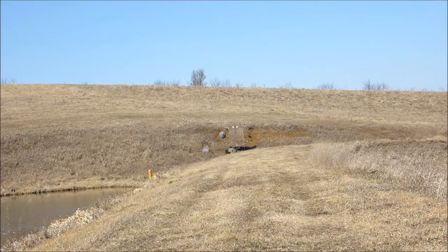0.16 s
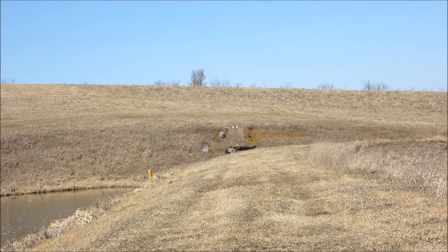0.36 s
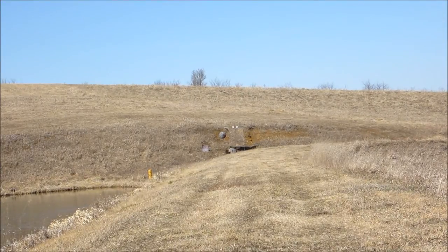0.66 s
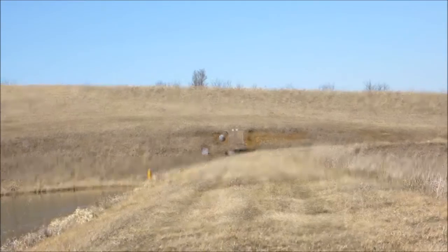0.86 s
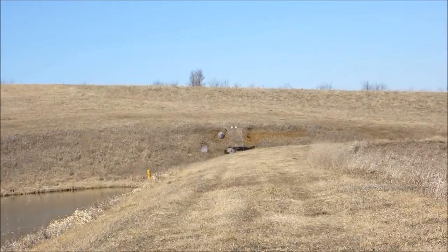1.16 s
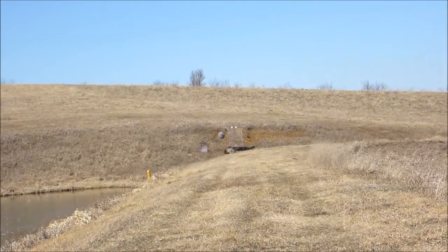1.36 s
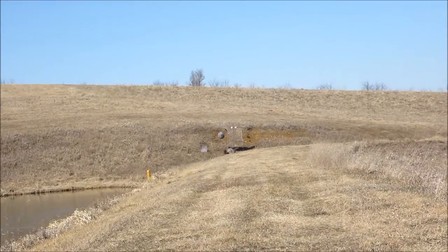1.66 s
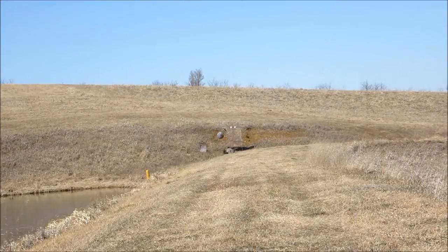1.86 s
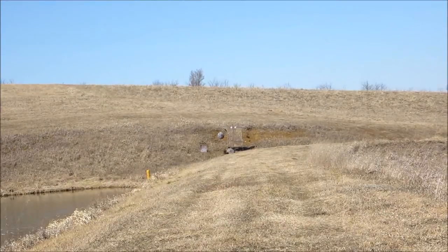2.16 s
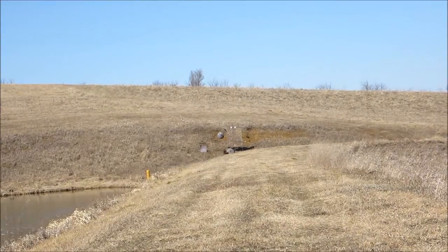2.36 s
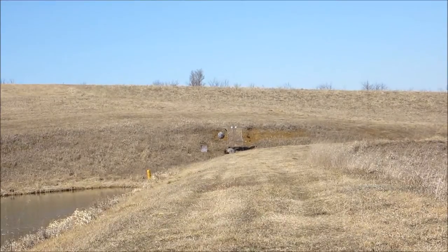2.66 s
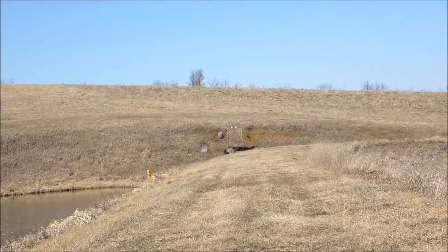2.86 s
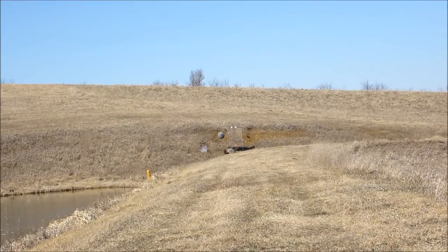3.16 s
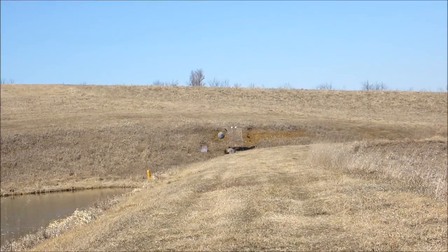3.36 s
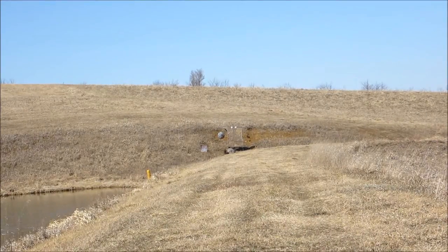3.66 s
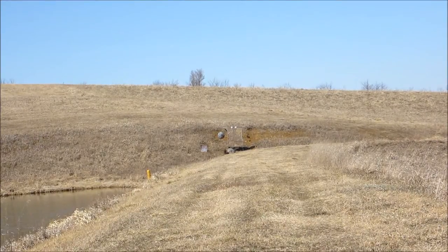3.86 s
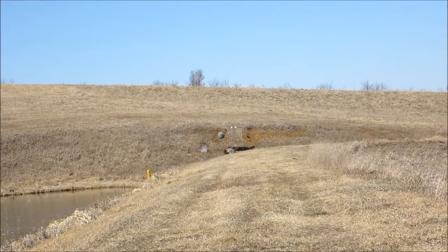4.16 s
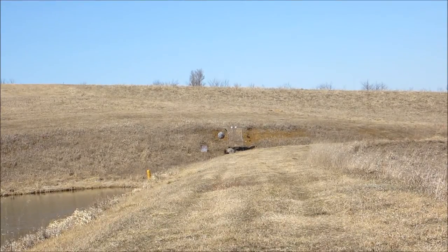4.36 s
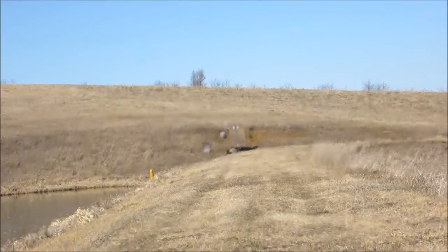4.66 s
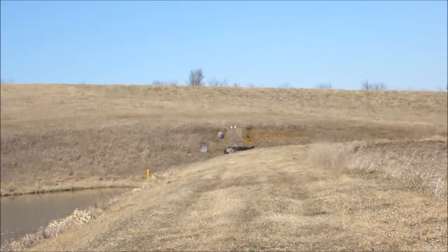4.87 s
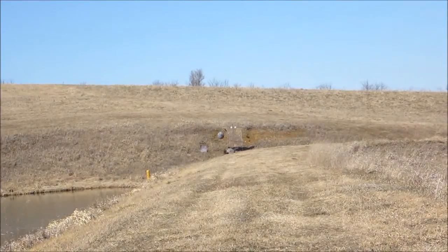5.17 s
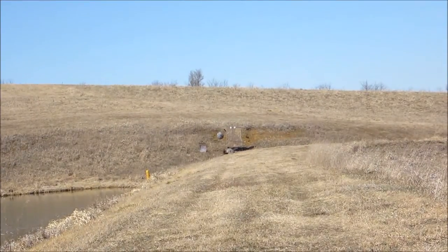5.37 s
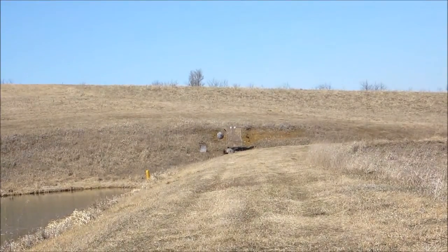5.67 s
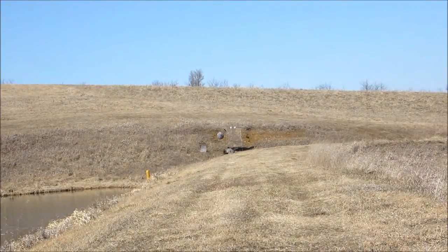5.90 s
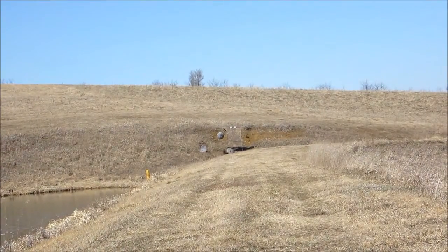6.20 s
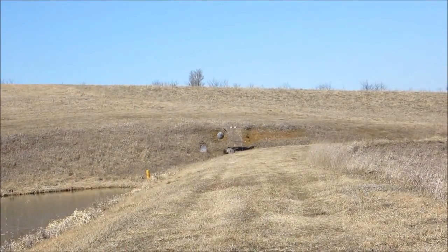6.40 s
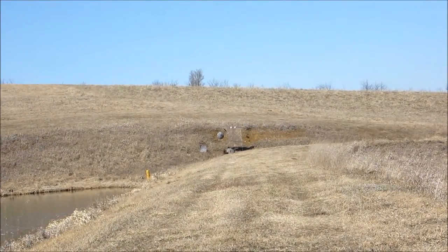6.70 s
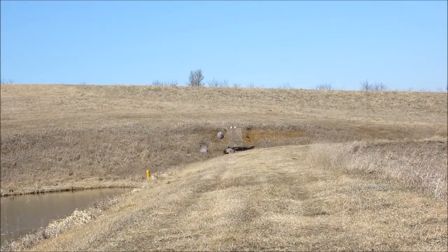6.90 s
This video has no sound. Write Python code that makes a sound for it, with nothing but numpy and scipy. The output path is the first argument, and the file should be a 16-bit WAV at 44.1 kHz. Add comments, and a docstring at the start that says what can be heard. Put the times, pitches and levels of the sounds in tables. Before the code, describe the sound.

Two sharp revolver shots, about four seconds apart, briefly overload a nearby microphone and roll away softly across grassy hills. Each is followed by a tiny double click of the trigger and, about a second later, the crisp ratcheting of the hammer being drawn back. The field is otherwise quiet, with a faint hiss of dry grass, a far engine humming and a few low wind bumps.

```python
"""Two revolver shots in a field

A small revolver is fired twice near the microphone, facing a grassy bank. Each blast overloads the
input and knocks the gain down; the slopes return a soft rushing echo. After each shot the trigger
springs back and the hammer is cocked. Wind nudges the microphone, grass hisses, an engine hums far off."""
import sys
import numpy as np
from scipy import signal
from scipy.fft import rfft, irfft
from scipy.io import wavfile

SR = 44100
rng = np.random.default_rng(int(sys.argv[2]) if len(sys.argv) > 2 else 0)


def unload_wav(signal):
    """Save mono or channel-first audio to the path in sys.argv[1] as 16-bit WAV at rate SR, clipped to [-1, 1]."""
    wavfile.write(
        sys.argv[1],
        SR,
        np.round(np.clip(np.atleast_2d(signal).T, -1, 1) * 32767).astype(np.int16),
    )


N = 310464
TIME = np.arange(N) / SR

# Hammer drawn back. Each row: start in seconds, duration factor, level in dB, spring ring in dB.
COCKINGS = [(1.762, 1.0, 0, -61), (5.4452, .932, -.5, -70)]
# Clicks of one cocking, first pawl touch to full cock.
# Each row: seconds into the stroke, level in dB, ring in Hz, relative grip knock in dB.
STROKE_CLICKS = [(0.001, -36.5, 6900, -13), (.0305, -32.5, 3900, -14), (.0484, -31, 4120, -4),
                 (0.0687, -26.5, 9600, -8), (.096, -8, 4170, -21.5), (.1276, -27.5, 6700, -8),
                 (.142, -39.5, 11300, 7), (.159, -7.5, 3560, -12.5)]


def blast(t, rail_db=19, coupling_hz=230, tear_db=17, scatter_start_s=.002, scatter_attack_s=.018):
    """A hissing jet, then pressure fronts and scatter that flatten against the microphone's limit."""
    # Hammer and primer, cylinder-gap gas, muzzle jet.
    # Each row: start from the shot, attack, hold and t60 in seconds, level in dB.
    firing = [(-.0102, .0004, .0005, .04, -27), (-.004, .0014, .014, .02, -14),
              (-.0002, .0002, .0008, .014, 24.5)]
    # Shock pulses of the blast. Each row: delay and length in seconds, height in dB.
    shock_pulses = [(.0032, .0010, 28.5), (.0072, .0011, 26), (.0114, 0.00064, 28.5), (0.016, .00034, 24),
                    (.0208, .0002, 17)]
    # Near echoes. Each row: delay in seconds, level in dB, pitch in Hz, t60 in seconds.
    near_echoes = [(0.0376, 5.5, 947, .012), (0.0488, 13.5, 1653, 0.0076)]
    # Noise spectra. Each row: frequency in Hz, relative level in dB.
    jet_spectrum = [(500, -20.5), (1400, -12.5), (2200, -4.5), (2600, -6), (3600, 4), (5200, -6.5),
                    (7000, -1.5), (11000, -1.5), (13500, -1.5), (15500, -1), (16500, -30.5)]
    roar_spectrum = [(100, -1.5), (250, 0.5), (600, -2.5), (1000, -1), (1600, -3), (2600, -14),
                     (4000, -23.5), (15000, -47.5)]
    sizzle_spectrum = [(300, -5.5), (2000, -1.5), (3500, 0), (5000, -4), (10000, 0.5), (15500, -11.5)]

    gas = sum(from_db(db) * envelope(t - s, attack, hold, t60) for s, attack, hold, t60, db in firing)
    jet = gas * coloured(jet_spectrum)
    fronts = sum(from_db(db) * ((t > s) & (t < s + length)) for s, length, db in shock_pulses)
    fronts += (fronts > 0) * from_db(tear_db) * coloured(sizzle_spectrum)  # turbulence tears the tops
    fronts = cut(cut(fronts, 9000, "low"), coupling_hz, "high", order=1)  # leaves an undershoot
    # Nearby grass scatters a dull roar, a bright sizzle and a faint lingering hiss.
    age_s = t - scatter_start_s
    roar = from_db(-1) * envelope(age_s, scatter_attack_s, hold_s=.011, t60_s=.115)
    sizzle = from_db(-.5) * envelope(age_s, scatter_attack_s, hold_s=.0022, t60_s=.08)
    linger = from_db(-34) * envelope(age_s, scatter_attack_s, hold_s=0, t60_s=1.3)
    # Only crests pass the saturated capsule: one-sided spikes.
    crests = np.maximum(unit_rms(cut(rng.standard_normal(N), 7000, "low")) - 1.2, 0)
    spikes = unit_rms(cut(crests, 400, "high", order=1)) * np.exp(-((t - .02) / .0055) ** 2)
    dull = (roar + from_db(-7) * linger) * coloured(roar_spectrum)
    bright = (sizzle + linger) * coloured(sizzle_spectrum)
    scatter = (dull + bright + spikes) * (age_s > 0)
    slaps = sum(from_db(db) * ring(t - s, hz, t60) for s, db, hz, t60 in near_echoes)
    rail = from_db(rail_db)
    return jet + rail * np.tanh((fronts + scatter + slaps) / rail)


def slope_echoes(t, loss_db_per_s=9.5, air_db_per_s_khz=11, patchy_db=2.5, shared_db=1.44, patch_hz=200):
    """The bank returns a swell, the land beyond a duller roll, single faces puffs; tufts roughen all."""
    # Echo spectra. Each row: frequency in Hz, level in dB per half octave.
    bank_spectrum = [(280, -48), (600, -51.5), (1200, -38), (2600, -37), (4000, -43.5), (7000, -48.5),
                     (10000, -56), (14000, -66)]
    roll_spectrum = [(300, -57.5), (600, -53), (1200, -46.5), (2400, -50), (4500, -58), (8000, -62),
                     (14000, -78)]
    # Terrain faces. Each row: delay and spread in seconds, level in dB, centre in Hz, half width in octaves.
    faces = [(.09, 0.0091, -26.5, 7950, .9), (.158, 0.0023, -25.5, 2800, 1),
             (0.279, 0.011, -29, 1190, 0.76), (.317, .005, -25, 1190, 0.66),
             (.396, 0.0076, -31.5, 990, .73), (0.426, 0.0043, -33, 3600, 0.87), (.47, .03, -47, 6500, .25),
             (.5, .05, -42, 2880, .25), (.511, .016, -33, 780, 1.2), (.591, .003, -36, 1200, 1.63),
             (.71, .06, -50, 2000, 0.32), (1.235, 0.025, -47.5, 910, .29), (1.535, 0.013, -49, 850, 0.23)]

    out = np.zeros(N)
    for hz in 280 * 2 ** (np.arange(12) / 2):
        arrival_s = at_hz([(1300, .32), (3000, .42)], hz)  # treble comes later
        onset = np.clip((t - .198) / .039, 0, 1) ** 2
        bank = from_db(at_hz(bank_spectrum, hz)) * onset * swell(t - arrival_s, spread_s=.093)
        t60_s = 60 / (loss_db_per_s + air_db_per_s_khz * hz / 1000)  # air takes the treble first
        roll = from_db(at_hz(roll_spectrum, hz)) * envelope(t - .18, attack_s=.46, hold_s=0, t60_s=t60_s)
        out += np.hypot(bank, roll) * from_db(patchy_db * drift(patch_hz)) * band(hz, octaves=.25)
    for delay_s, spread_s, db, hz, octaves in faces:
        out += from_db(db) * band(hz, octaves) * swell(t - delay_s, spread_s)
    return out * from_db(shared_db * drift(patch_hz)) * (t > 0)


def lockwork(rise_s=.000353, crack_t60_s=.015, knock_t60_s=.033):
    """Each click is a hard impact and a burst of tiny steel contacts; part, frame and grip ring."""
    # Trigger springing back or touched.
    # Each row: start in seconds, level in dB, ring in Hz, relative grip knock in dB.
    trigger_clicks = [(.9579, -9, 10900, -20), (.9847, -15, 10800, -19), (2.0513, -32, 3660, -9),
                      (4.7762, -11, 11110, -19), (4.8046, -16.5, 10900, -20), (5.7363, -32.5, 3670, -7)]
    # Steel frame and cylinder. Each row: mode in Hz, level in dB, t60 in seconds.
    steel_modes = [(1828, -24, 0.012), (3370, -23.5, 0.0078), (4180, -17, 0.03), (6790, -14, .02),
                   (7320, -14.5, 0.016), (8160, -11, 0.017), (8810, -11.5, 0.025), (9300, -22, 0.033),
                   (10360, -15, .022), (12800, -23, .022)]

    cocking_clicks = [(s + stretch * lag_s, db + click_db, hz, grip_db)
                      for s, stretch, db, _ in COCKINGS
                      for lag_s, click_db, hz, grip_db in STROKE_CLICKS]
    out, t = np.zeros(N), TIME[:SR // 8]
    for start_s, db, hz, grip_db in trigger_clicks + cocking_clicks:
        contacts = rng.standard_normal(len(t)) * from_db(-60 * t / crack_t60_s)
        contacts *= 1 - np.exp(-t / rise_s)
        impact = from_db(9) * ring(t - rise_s, hz=10500, t60_s=.00073)
        crack = cut(cut(contacts + impact, 2400, "high", order=1), 14000, "low")
        frame = sum(from_db(mode_db + rng.normal(0, 3)) * rng.choice([-1, 1]) * ring(t, mode_hz, t60)
                    for mode_hz, mode_db, t60 in steel_modes)
        part = unit_burst(ring(t, hz, t60_s=.014))
        click = unit_burst(unit_burst(crack + from_db(-2) * frame) + from_db(-7) * part)
        grip = rng.standard_normal(len(t)) * from_db(-60 * t / knock_t60_s)
        knock = unit_burst(cut(grip, [280, 1800], "band", order=1))
        add(out, start_s, from_db(db) * (click + from_db(grip_db - 1) * knock))
    return out


def full_cock():
    """The hammer lands in its notch: the grip thuds, the spring rings on faintly."""
    out = np.zeros(N)
    for start_s, stretch, db, spring_db in COCKINGS:
        t = TIME - start_s - stretch * STROKE_CLICKS[-1][0]
        thud = from_db(db - 24.5) * ring(t, hz=104, t60_s=.058)
        spring = from_db(spring_db) * ring(t, hz=6675, t60_s=.8)
        out += thud + spring
    return out


def cylinder(slip_hz=500, slip_db=5, pawl_hz=9520):
    """The turning cylinder slides unevenly, steel on steel; the pawl sings on its ratchet."""
    turn, pawl = np.zeros(N), np.zeros(N)
    for start_s, stretch, db, _ in COCKINGS:
        t = (TIME - start_s) / stretch
        turn += from_db(db - 50) * swell(t - .096, spread_s=.044)
        pawl += from_db(db - 40) * swell(t - .089, spread_s=.011)
    slips = from_db(slip_db * drift(slip_hz))
    friction = unit_rms(cut(rng.standard_normal(N), [2500, 12000], "band"))
    return turn * slips * friction + pawl * band(pawl_hz, octaves=.018)


def wind(breeze_db=-45, lump_db=4, lump_hz=22, rumble_trim_db=-2, buffet_trim_db=-1):
    """Turbulence rumbles in lumps; single eddies thump against the microphone port."""
    # Swells of the breeze. Each row: middle and spread in seconds, relative level in dB.
    gusts = [(.02, .07, -32), (.55, 0.095, -35.5), (.73, 0.021, -33), (2.58, 0.043, -38), (4.08, .21, -32),
             (4.48, 0.036, -33), (5.32, .03, -27.5), (5.87, 0.061, -36), (6.3, 0.14, -28),
             (6.8, 0.037, -32), (7.02, .03, -32)]
    # Rumble spectrum. Each row: frequency in Hz, relative level in dB.
    rumble_spectrum = [(15, -5), (35, 3.5), (60, -1), (100, -10), (160, -17.5), (250, -32.5), (500, -59.5),
                       (2000, -89)]
    # Eddies. Each row: middle in seconds, relative peak in dB, upper band edge in Hz.
    buffets = [(3.615, -31, 148), (3.84, -25, 263), (3.869, -17.5, 165), (3.954, -33.5, 195),
               (4.107, -20.5, 203), (4.146, -19, 160), (4.174, -18.5, 307), (6.155, -26, 160),
               (6.253, -27, 221), (6.295, -22, 261), (6.372, -26.5, 200), (6.44, -24.5, 146),
               (7.013, -21.5, 86)]

    gust_power = sum((from_db(db) * swell(TIME - s, spread_s)) ** 2 for s, spread_s, db in gusts)
    flow = np.sqrt(from_db(breeze_db) ** 2 + gust_power)
    lumps = from_db(rumble_trim_db + lump_db * drift(lump_hz))
    out = flow * lumps * cut(coloured(rumble_spectrum), 23, "high")
    t = TIME[:SR // 5] - .1
    for middle_s, db, hz in buffets:
        eddy = cut(rng.standard_normal(len(t)), [hz / 3, hz], "band", order=4) * swell(t, spread_s=.0066)
        add(out, middle_s + t[0], from_db(db + buffet_trim_db) * eddy / np.abs(eddy).max())
    return out


def far_engine(waver_hz=2.1, throb_db=1.5):
    """A distant engine hums, unsteady in pitch and level."""
    # Course of the hum. Each row: time in seconds, pitch in Hz, level in dB.
    course = [(0, 99.2, -48.5), (1.5, 98.5, -51), (2.9, 95.46, -49.5), (3.6, 99.5, -48.5), (4.6, 98.6, -53),
              (7, 98.4, -56)]
    times_s, pitches_hz, levels_db = np.transpose(course)
    hz = np.interp(TIME, times_s, pitches_hz) + waver_hz * drift(22)
    db = np.interp(TIME, times_s, levels_db) + throb_db * drift(12)
    return from_db(db) * np.sqrt(2) * np.sin(2 * np.pi * np.cumsum(hz) / SR)


def grass(level_db=-54):
    """Dry grass hisses evenly."""
    # Field noise. Each row: frequency in Hz, relative level in dB.
    field_spectrum = [(76, -32), (130, 1), (147, -9), (307, -16), (449, -17.5), (1150, -23.5), (1490, -23),
                      (2560, -27.5), (8010, -32), (13500, -38), (15500, -42)]
    return from_db(level_db) * coloured(field_spectrum)


def from_db(db):
    return 10 ** (np.asarray(db) / 20)


def unit_rms(x):
    return x / np.sqrt(np.mean(x ** 2) + 1e-20)


def unit_burst(x):
    """Scaled to the energy of 2 ms at rms 1."""
    return x / np.sqrt(np.sum(x ** 2) / (.002 * SR))


def at_hz(curve, hz):
    """A curve's value, interpolated over log frequency."""
    knots_hz, values = np.transpose(curve)
    return np.interp(np.log(hz), np.log(knots_hz), values)


def cut(x, hz, kind, order=2):
    """Butterworth filter."""
    sos = signal.butter(order, np.clip(hz, 10, .45 * SR), kind, fs=SR, output="sos")
    return signal.sosfilt(sos, x + 1e-18)


def coloured(spectrum):
    """Noise with the given spectrum; rms 1."""
    hz = np.maximum(np.fft.rfftfreq(N, 1 / SR), 1)
    return unit_rms(irfft(rfft(rng.standard_normal(N)) * from_db(at_hz(spectrum, hz)), N))


def band(hz, octaves):
    """Noise within so many octaves either side of hz; rms 1."""
    return unit_rms(cut(rng.standard_normal(N), [hz / 2 ** octaves, hz * 2 ** octaves], "band"))


def drift(rate_hz):
    """Random wander with a spread near 1."""
    knots = rng.standard_normal(N // 10)
    return np.interp(TIME * rate_hz, np.arange(len(knots)), knots)


def ring(t, hz, t60_s):
    """Decaying sine from t = 0."""
    t = np.maximum(t, 0)
    return np.sin(2 * np.pi * hz * t) * from_db(-60 * np.minimum(t / t60_s, 4))


def envelope(t, attack_s, hold_s, t60_s):
    """Rises from t = 0, holds, decays."""
    rise = np.clip(t / attack_s, 0, 1) ** 2
    return rise * from_db(-60 * np.clip((t - attack_s - hold_s) / t60_s, 0, 4))


def swell(t, spread_s):
    """Bell curve around t = 0."""
    return np.exp(-.5 * np.minimum((t / spread_s) ** 2, 100))


def add(track, start_s, sound):
    i = max(int(round(start_s * SR)), 0)
    track[i:i + len(sound)] += sound[:N - i]


def scene():
    """Gun, echoes, wind and field at one microphone."""
    # Shot times in seconds.
    shots_s = [0.7870, 4.6099]
    # Seconds from the current shot; negative while its hammer falls.
    t = TIME - np.where(TIME < shots_s[1] - .02, shots_s[0], shots_s[1])
    gun = blast(t) + slope_echoes(t) + lockwork() + full_cock() + cylinder()
    return (gun + wind() + far_engine() + grass())[None]


def record(dry, ceiling_db=26, recovery_s=2.93, cutoff_hz=16000):
    """The input clips; gain drops at once to hold full scale and creeps back; the top is cut."""
    ceiling = from_db(ceiling_db)
    clipped = np.clip(dry, -ceiling, ceiling)
    allowed_gain = 1 / np.maximum(np.abs(clipped), 1)
    creep = TIME / recovery_s
    gain = np.minimum.accumulate(allowed_gain - creep, axis=-1) + creep
    lowpass = signal.ellip(12, .1, 85, cutoff_hz, fs=SR, output="sos")
    return signal.sosfilt(lowpass, clipped * gain)


dry = scene()
out = record(dry)
unload_wav(out)
```